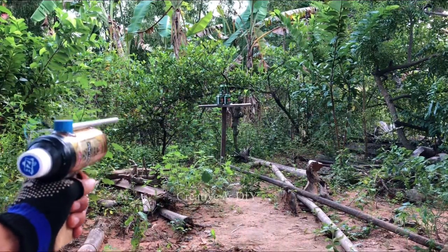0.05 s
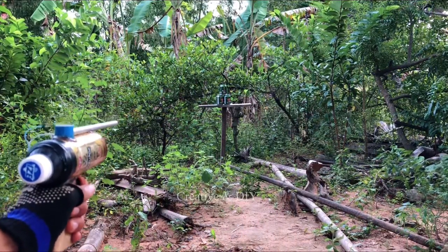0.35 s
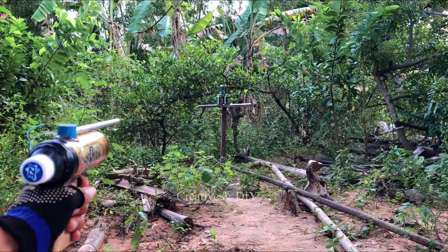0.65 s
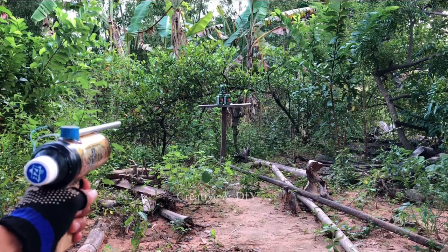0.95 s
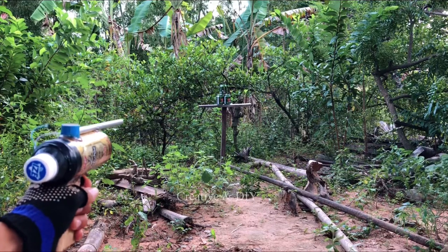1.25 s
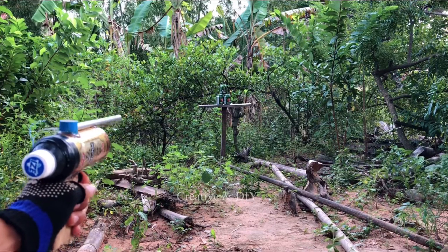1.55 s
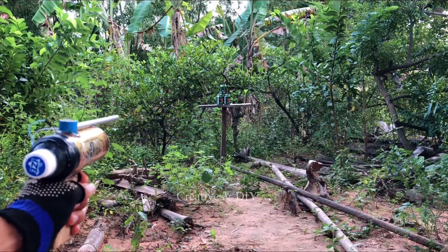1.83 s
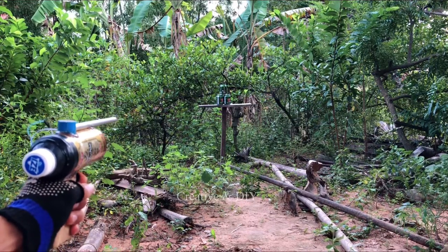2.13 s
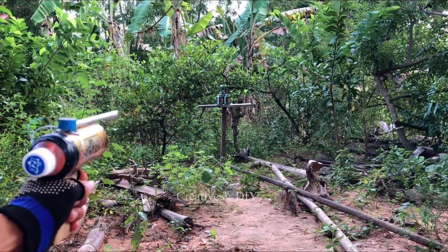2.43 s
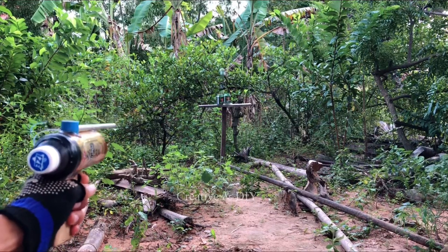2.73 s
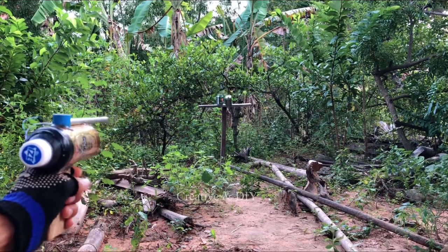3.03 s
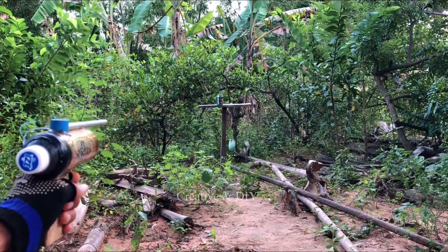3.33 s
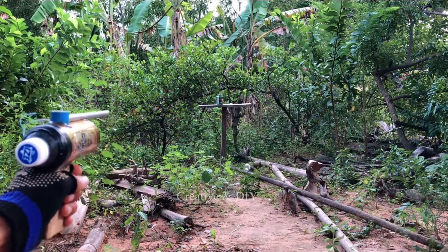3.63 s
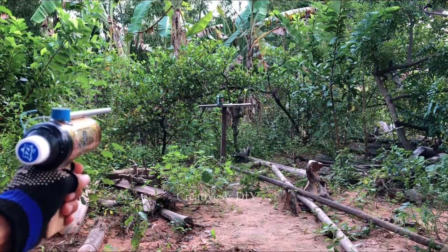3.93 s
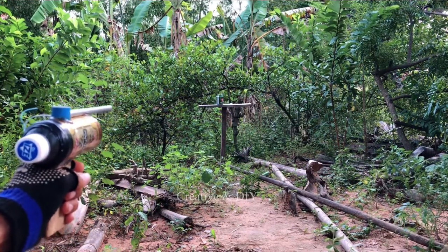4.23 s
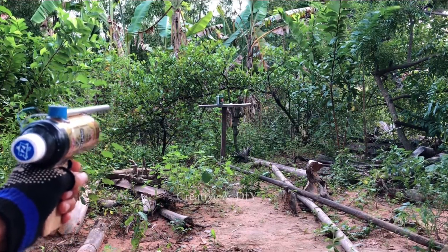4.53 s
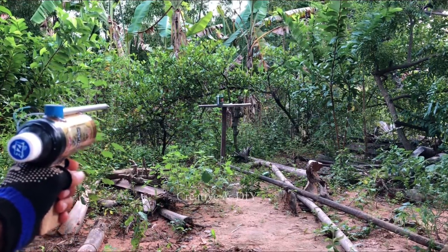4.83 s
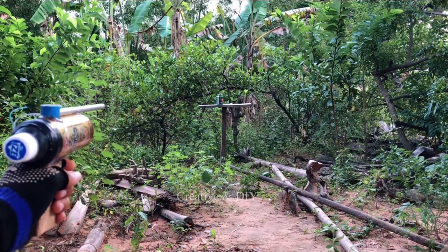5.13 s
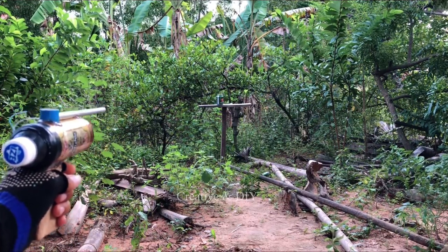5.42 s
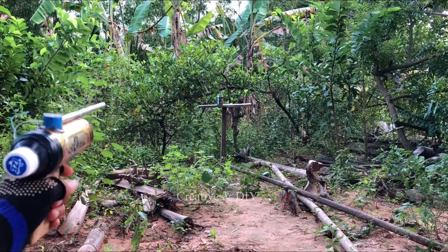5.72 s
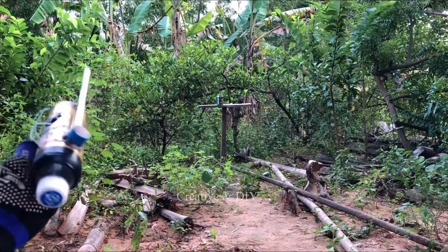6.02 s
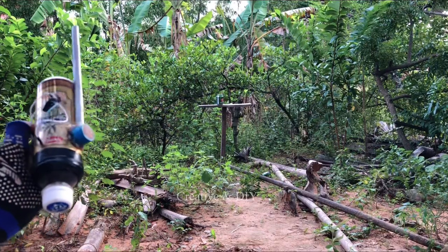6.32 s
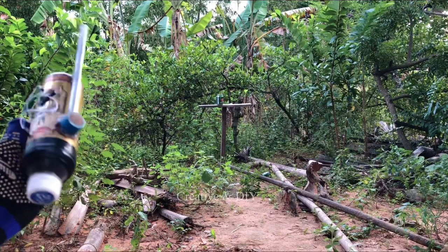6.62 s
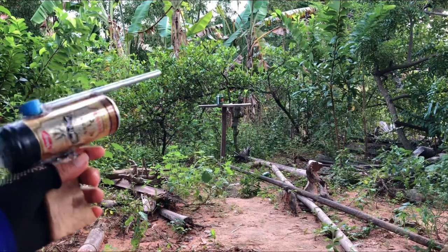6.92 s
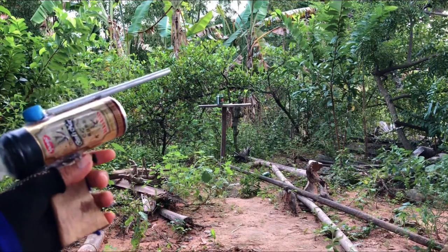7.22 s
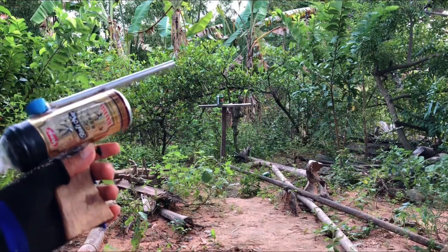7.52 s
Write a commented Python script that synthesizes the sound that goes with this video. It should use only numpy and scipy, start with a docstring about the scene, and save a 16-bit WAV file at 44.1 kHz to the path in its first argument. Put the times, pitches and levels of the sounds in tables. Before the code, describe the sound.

In a quiet garden with faint hissing insects and a low rumble, a homemade can gun clicks and fires with a sharp, hissing pop. A split second later the pellet cracks against a small tin. The tin totters, drops onto wooden poles with a loud clank and bounces a few times. Afterwards a glove rustles softly and a bird calls far off. The microphone is just behind the gun.

```python
"""Can gun in a garden

A spirit gun made of drink cans fires: the igniter clicks, burning gas rushes out with a pop, and the
pellet cracks against a small tin. The tin totters on its stand, falls onto wooden poles and bounces
away; a glove rustles. Insects hiss in the overgrown foliage over a low rumble, and birds call far off."""
import sys
import numpy as np
from scipy import signal
from scipy.fft import rfft, irfft, next_fast_len
from scipy.io import wavfile

SR = 44100
rng = np.random.default_rng(int(sys.argv[2]) if len(sys.argv) > 2 else 0)


def dump_mix(stems):
    """Bounce the given channels to the path in sys.argv[1] as a 16-bit WAV at rate SR."""
    frames = np.atleast_2d(stems).T  # one column per channel
    limited = np.clip(frames, -1, 1)  # hard clip at full scale
    pcm = np.round(limited * 32767).astype(np.int16)
    wavfile.write(sys.argv[1], SR, pcm)


N = 333616
TIME_S = np.arange(N) / SR

# Noise spectra. Each row: frequency in Hz, relative level in dB.
AIR_SPECTRUM = [(20, -44), (35, -17), (55, -3), (135, 4.5), (200, -2.5), (300, -10.5), (600, -15.5),
                (1200, -18), (2000, -20.5), (3500, -21), (5200, -24.5), (7500, -26), (12000, -30.5),
                (16000, -38)]
RUMBLE_SPECTRUM = [(25, -32), (60, 3.5), (90, 2.5), (130, 4.5), (190, -4.5), (400, -18), (2000, -66)]
BREEZE_SPECTRUM = [(100, 4), (300, -14.5), (650, -2), (1150, -4), (2000, -16), (5000, -58)]
CLICK_SPECTRUM = [(300, -23), (1200, -12), (3000, -3.5), (6000, 1), (10000, 0), (16000, -7)]
JET_SPECTRUM = [(60, -10), (250, -11), (800, -17.5), (1600, -10), (2500, -4.5), (3900, -7.5), (5200, -2),
                (8500, 0.5), (10500, 0), (13000, 0.5), (16000, -4)]
POP_SPECTRUM = [(50, -14), (250, -10), (800, 3), (2500, 3), (6000, -26), (16000, -4)]
HIT_SPECTRUM = [(100, -15), (500, -6), (800, 5), (1150, 18), (1500, 7), (1800, -3), (3200, 3), (6000, -3),
                (10000, 3.5), (16000, -19)]
NEAR_ECHO_SPECTRUM = [(80, -20), (400, -9), (750, 4), (1050, 5), (1400, -3.5), (2000, -2), (5500, 2),
                      (10000, -1), (16000, -3.5)]
FAR_ECHO_SPECTRUM = [(80, -16), (450, 5.5), (800, -0.5), (1500, 5), (3500, -4.5), (8000, -12.5),
                     (16000, -19)]
LANDING_SPECTRUM = [(100, -13), (520, 5.5), (750, -2.5), (1000, -15), (1350, -2.5), (1800, -4),
                    (3200, -2.5), (5200, 1.5), (9500, -2), (16000, -13.5)]
GLOVE_SPECTRUM = [(500, -14), (2500, -1), (7000, 5), (12000, -2), (16000, -16)]
# Gusts. Each row: crest and half-width in seconds, rumble rise and breeze rise in dB.
WIND_GUSTS = [(.15, 0.27, 1.5, 3), (2.0, .28, 7, 3), (4.25, 0.43, 7, 9), (5.15, 0.49, 7.5, 8),
              (6.1, 0.42, 6.5, 5.5)]
# Insect chorus. Each row: centre and width in Hz, level and signed throb depth in dB.
INSECT_BANDS = [(6190, 230, -61, .5), (8236, 470, -56.5, 3), (8800, 380, -61.5, -2.5),
                (10000, 830, -57.5, -0.2), (10570, 600, -57, 0.2), (11250, 450, -66, -3)]
# Cricket trills. Each row: start and length in seconds, level in dB.
CRICKET_TRILLS = [(0.01, .35, -63.5), (1.147, .25, -63), (2.105, 0.095, -59), (4.09, 0.37, -62.5),
                  (4.797, 0.094, -59), (5.023, 0.16, -56.5), (5.65, 0.2, -58), (5.876, 0.1, -58.5),
                  (7.284, 0.084, -54)]
# Small bird. Each row: start in seconds, level in dB.
BIRD_CHIRPS = [(1.14, -61), (4.91, -57.5), (5.97, -58)]
# Far birds. Each row: start and length in seconds, level and relative octave level in dB,
# pitch, scoop depth and warble depth in Hz.
BIRD_CALLS = [(1.6, 0.68, -53.5, -6, 1416, 480.5, 10), (6.599, 1.1, -50, -13, 1730, -80, 54.7)]
# Scatter from leaves and trunks. Each row: frequency in Hz, relative level in dB, T60 in seconds.
FOLIAGE_BANDS = [(100, 0, 0.3), (400, 3, 0.24), (1300, -2, 0.43), (3355, 2.5, 0.28), (8000, -5, 0.39),
                 (16000, -0.5, 0.15)]
# Igniter and trigger. Each row: start in seconds, level in dB, T60 in seconds.
IGNITER_CLICKS = [(2.4791, -1, 0.0089), (2.483, -15, .008), (2.751, -14, 0.0081)]
# Gas leaks, forces past the pellet, then rushes from the can.
# Each row: start, attack, hold and release T60 in seconds, level in dB.
JET_STAGES = [(2.483, .002, .012, .02, -29), (2.495, .009, .011, .02, -3), (2.515, .014, 0.027, .11, -7)]
# Tin and pole modes. Each row: frequency in Hz, relative level in dB, T60 in seconds.
TIN_MODES = [(1276, -30, .33), (1400, -29, .18), (1588, -32, .55), (1690, -28, .65), (3397, -26.5, .33),
             (2304, -17.5, .17), (2923, -22, .15), (3149, -29, .2), (3671, -25, .24), (4280, -25, .14),
             (4624, -21, .13), (4800, -17.5, .12), (5093, -18.5, .14), (5604, -20, .12), (6670, -31, .14),
             (7542, -29, .12)]
POLE_MODES = [(455, -10, 0.086), (590, -10.5, 0.027), (1565, -19, 0.11), (2475, -10.5, 0.097),
              (5640, -29, 0.16), (7360, -11.5, 0.035)]
# Tin on its stand. Each row: start in seconds, relative scrape level in dB, scrape T60 in seconds,
# relative ring level in dB, pitch in Hz.
STAND_CONTACTS = [(3.006, -32, 0.18, -30.5, 1470), (3.04, -42, 0.15, -33.5, 1272),
                  (3.085, -48, .08, -34, 1760), (3.097, -46, 0.089, -34, 2116),
                  (3.205, -36, 0.059, -50, 1580)]
# Ring of one contact. Each row: pitch multiple, relative level in dB, T60 in seconds.
CONTACT_MODES = [(1, -1.5, 0.14), (1.5, -8, .09), (2.06, -3, 0.048), (3.12, 0, 0.032)]
# Tin on the poles. Each row: start in seconds, gains of crack, tin, pole and clank in dB,
# clank centre in Hz, clank T60 in seconds.
TIN_BOUNCES = [(3.4645, -41, -45, -42, -8, 1910, 0.032), (3.4665, -4.5, 1, -2, 5, 1898, 0.015),
               (3.507, -27, -13, -30, -23.5, 718, 0.18), (3.587, -42, -27, -24.5, -27, 2560, 0.073),
               (3.69, -38, -36, -48, -36.5, 5300, .07), (3.7575, -29.5, -26, -15.5, -36, 2450, 0.027),
               (3.899, -31.5, -29, -52, -37, 3390, 0.16), (3.993, -51, -34, -41, -39.5, 3650, 0.14)]


def from_db(db):
    """Decibels to gain."""
    return 10 ** (np.asarray(db) / 20)


def shaped_noise(gain_at):
    """Unit-RMS noise, spectrum set by a function of frequency."""
    size = next_fast_len(N)
    hz = np.maximum(np.fft.rfftfreq(size, 1 / SR), 1)
    x = irfft(rfft(rng.standard_normal(size)) * gain_at(hz), size)[:N]
    return x / np.sqrt(np.mean(x ** 2) + 1e-20)


def noise(spectrum):
    """Unit-RMS noise from a spectrum table."""
    points_hz, points_db = np.transpose(spectrum)
    return shaped_noise(lambda hz: from_db(np.interp(np.log(hz), np.log(points_hz), points_db)))


def band_noise(centre_hz, width_hz):
    """Unit-RMS noise in one Gaussian band."""
    return shaped_noise(lambda hz: np.exp(-2 * np.log(2) * ((hz - centre_hz) / width_hz) ** 2))


def decay(start_s, t60_s):
    """Instant onset, exponential fall for one second."""
    out, at = np.zeros(N), int(np.ceil(start_s * SR))
    t = TIME_S[:min(SR, N - at)]
    out[at:at + len(t)] = from_db(-60 * t / t60_s)
    return out


def envelope(start_s, attack_s, hold_s, t60_s):
    """Linear rise, hold, exponential release."""
    t = TIME_S - start_s
    return np.clip(t / attack_s, 0, 1) * from_db(-60 * np.clip((t - attack_s - hold_s) / t60_s, 0, 4))


def ring(start_s, modes):
    """Damped sines, common onset, random signs."""
    out, at = np.zeros(N), int(start_s * SR)
    t = TIME_S[:min(SR, N - at)]
    for hz, db, t60_s in modes:
        sign = rng.choice([-1, 1])
        out[at:at + len(t)] += sign * from_db(db - 60 * t / t60_s) * np.sin(2 * np.pi * hz * t)
    return out


def sine(start_s, hz):
    """Sine of steady or running pitch."""
    return np.sin(2 * np.pi * np.cumsum(hz * (TIME_S >= start_s)) / SR)


def falling_sine(start_s, from_hz, to_hz, halving_s):
    """Pressure wave with stretching cycles: pitch drops fast, then slowly."""
    return sine(start_s, to_hz + (from_hz - to_hz) / (1 + np.maximum(TIME_S - start_s, 0) / halving_s))


def garden_echo(x, delay_s, build_s, late_db):
    """Leaves scatter a dense echo that dies by band; far trees add a dull tail."""
    age_s = np.maximum(TIME_S[:SR] - delay_s, 0)
    hz, db, t60_s = np.transpose(FOLIAGE_BANDS)
    edges_hz = np.geomspace(50, 18000, 10)
    leaves = 0
    for low_hz, high_hz in zip(edges_hz, edges_hz[1:]):
        bandpass = signal.butter(2, [low_hz, high_hz], "band", fs=SR, output="sos")
        band = signal.sosfilt(bandpass, rng.standard_normal(SR))
        log_centre = np.log(low_hz * high_hz) / 2
        band_db = np.interp(log_centre, np.log(hz), db)
        band_t60_s = np.interp(log_centre, np.log(hz), t60_s)
        leaves += band * from_db(band_db - 60 * age_s / band_t60_s)
    leaves *= 1 - np.exp(-age_s / build_s)
    dull = signal.butter(1, [300, 3000], "band", fs=SR, output="sos")
    trees = from_db(late_db) * signal.sosfilt(dull, rng.standard_normal(SR))
    response = leaves + trees * np.exp(-age_s / .093) * (1 - np.exp(-age_s / .05))
    return signal.fftconvolve(x, response / np.sqrt(np.sum(response ** 2)))[:N]


def still_air():
    """Steady, bass-heavy noise floor."""
    return from_db(-43.5) * noise(AIR_SPECTRUM)


def wind():
    """Gusts raise a far rumble and a breeze in the leaves."""
    rumble_db, breeze_db = -48.5, -56
    for crest_s, half_width_s, rumble_rise_db, breeze_rise_db in WIND_GUSTS:
        gust = np.exp(-((TIME_S - crest_s) / half_width_s) ** 2)
        rumble_db += rumble_rise_db * gust
        breeze_db += breeze_rise_db * gust
    return from_db(rumble_db) * noise(RUMBLE_SPECTRUM) + from_db(breeze_db) * noise(BREEZE_SPECTRUM)


def insects(throb_hz=7.2):
    """Throbbing chorus and narrow-band cricket trills."""
    throb = np.sin(2 * np.pi * throb_hz * TIME_S + band_noise(centre_hz=1, width_hz=1))
    chorus = sum(from_db(db + depth_db * throb) * band_noise(hz, width_hz)
                 for hz, width_hz, db, depth_db in INSECT_BANDS)
    trills = sum(from_db(db) * np.sqrt(np.maximum(1 - (2 * (TIME_S - start_s) / length_s - 1) ** 2, 0))
                 for start_s, length_s, db in CRICKET_TRILLS)
    return chorus + trills * band_noise(centre_hz=4867, width_hz=37)


def birds():
    """Falling chirps and scooped, warbling calls; paths through the trees blur level and phase."""
    chirp_s, chirp_hz, sag_hz_per_s, chirp_rasp_hz = .35, 3610, 800, 70
    scoop_s, warble_rate_hz, attack_s, release_s, call_rasp_hz = .11, 2.65, .14, .21, 22
    song = np.zeros(N, complex)
    rasp = band_noise(centre_hz=30, width_hz=79)
    for start_s, db in BIRD_CHIRPS:
        on = (TIME_S >= start_s) & (TIME_S < start_s + chirp_s)
        t = TIME_S[on] - start_s
        pitch_hz = chirp_hz - sag_hz_per_s * t + chirp_rasp_hz * rasp[on]
        tone = np.exp(2j * np.pi * np.cumsum(pitch_hz) / SR)
        song[on] += from_db(db) * np.sin(np.pi * np.sqrt(t / chirp_s)) * tone
    for start_s, length_s, db, octave_db, hz, scoop_hz, warble_hz in BIRD_CALLS:
        on = (TIME_S >= start_s) & (TIME_S < start_s + length_s)
        t = TIME_S[on] - start_s
        pitch_hz = hz - scoop_hz * np.exp(-t / scoop_s) - warble_hz * np.cos(2 * np.pi * warble_rate_hz * t)
        tone = np.exp(2j * np.pi * np.cumsum(pitch_hz + call_rasp_hz * rasp[on]) / SR)
        effort = np.clip(np.minimum(t / attack_s, (length_s - t) / release_s), 0, 1)
        song[on] += from_db(db) * effort * (tone + from_db(octave_db) * tone ** 2)
    blur = band_noise(centre_hz=0, width_hz=85) + 1j * band_noise(centre_hz=0, width_hz=85)
    return np.real(blur * song)


def igniter():
    """Sharp clicks; the first rings the housing."""
    clicks = sum(from_db(db) * decay(start_s, t60_s) for start_s, db, t60_s in IGNITER_CLICKS)
    dry = clicks * noise(CLICK_SPECTRUM) + ring(IGNITER_CLICKS[0][0], [(3130, -12.5, .019)])
    return dry + from_db(-7.5) * garden_echo(dry, delay_s=.0071, build_s=.003, late_db=-28)


def shot(pop_s=2.5105, whistle_s=2.56, sag_hz_per_s=570):
    """Gas hisses past the pellet, pops and expands into a thump and boom; the barrel whistles."""
    flow = sum(from_db(db) * envelope(*timing_s) for *timing_s, db in JET_STAGES)
    jet = flow * noise(JET_SPECTRUM)
    pop = from_db(-6.5) * decay(pop_s, t60_s=.019) * noise(POP_SPECTRUM)
    pulse = falling_sine(pop_s, from_hz=2200, to_hz=60, halving_s=.000603)
    thump = from_db(-5) * decay(pop_s, t60_s=.026) * pulse
    boom = from_db(-25.5) * envelope(pop_s, attack_s=.015, hold_s=.0083, t60_s=.16) * sine(pop_s, hz=82.5)
    jitter_hz = 45 * band_noise(centre_hz=60, width_hz=150)
    tone = sine(whistle_s, 3385 - sag_hz_per_s * (TIME_S - whistle_s) + jitter_hz)   # sags as flow dies
    whistle = from_db(-19.5) * envelope(whistle_s, attack_s=.015, hold_s=.033, t60_s=.04) * tone
    dry = jet + pop + thump + boom + whistle
    return dry + from_db(-9.5) * garden_echo(dry, delay_s=.019, build_s=.018, late_db=-11)


def pellet_hit(hit_s=2.6198, echo_s=2.632):
    """Crack, knock and faint tin ring; near bushes throw it back, far trees add a dull tail."""
    impact = decay(hit_s, t60_s=.012) + from_db(-11) * decay(hit_s, t60_s=.03)
    crack = from_db(1.5) * impact * noise(HIT_SPECTRUM)
    pulse = falling_sine(hit_s, from_hz=1370, to_hz=450, halving_s=.004)
    knock = from_db(-5.5) * decay(hit_s, t60_s=.021) * pulse
    tin = from_db(.5) * ring(hit_s, TIN_MODES[:4])   # only the lowest modes carry this far
    build = 1 - np.exp(-np.maximum(TIME_S - echo_s, 0) / .0019)
    near = from_db(-6) * decay(echo_s, t60_s=.22) * noise(NEAR_ECHO_SPECTRUM)
    far = from_db(-26.5) * decay(echo_s, t60_s=.92) * noise(FAR_ECHO_SPECTRUM)
    return crack + knock + tin + build * (near + far)


def tin_totters():
    """Each touch on the stand scrapes grittily and rings at its own pitch."""
    grit = from_db(2.5 * band_noise(centre_hz=100, width_hz=190))
    scrape = grit * noise(CLICK_SPECTRUM)
    dry = 0
    for start_s, scrape_db, scrape_t60_s, ring_db, hz in STAND_CONTACTS:
        dry += from_db(scrape_db) * decay(start_s, scrape_t60_s) * scrape
        dry += ring(start_s, [(hz * ratio, ring_db + db, t60_s) for ratio, db, t60_s in CONTACT_MODES])
    return from_db(-.5) * dry + from_db(-4) * garden_echo(dry, delay_s=.0029, build_s=.003, late_db=-26)


def tin_lands():
    """Each landing cracks, clanks at a pitch set by the spot struck, and rings tin and poles."""
    crack = noise(LANDING_SPECTRUM)
    dry = 0
    for start_s, crack_db, tin_db, pole_db, clank_db, clank_hz, clank_t60_s in TIN_BOUNCES:
        impact = decay(start_s, t60_s=.015) + from_db(-8.5) * decay(start_s, t60_s=.21)
        spread = min(.3, (clank_hz / 2800) ** 3)   # wall modes; a low clank is nearly one note
        cluster_hz = clank_hz * (1 + spread * np.linspace(-1, 1, 7) + rng.normal(0, .01, 7))
        clank = ring(start_s, [(hz, clank_db - 9, clank_t60_s) for hz in cluster_hz])
        tin = ring(start_s, [(hz, tin_db + db + rng.normal(0, 1.5), t60_s) for hz, db, t60_s in TIN_MODES])
        poles = from_db(pole_db) * ring(start_s, POLE_MODES)
        dry += from_db(crack_db) * impact * crack + clank + tin + poles
    return dry + from_db(-17) * garden_echo(dry, delay_s=.02, build_s=.006, late_db=-17)


def glove():
    """The glove rustles as it turns the gun."""
    turn = envelope(start_s=6.34, attack_s=.05, hold_s=.33, t60_s=2.6)
    return from_db(-54.5) * turn * noise(GLOVE_SPECTRUM)


def scene():
    """Mono sum at a microphone behind the gun."""
    events = igniter() + shot() + pellet_hit() + tin_totters() + tin_lands()
    return (events + insects() + birds() + wind() + glove() + still_air())[None]


def record(dry, low_cut_hz=33, high_cut_hz=16050, ceiling=1.17):
    """Small microphone: deep bass dropped, peaks overloaded, top cut."""
    highpass = signal.butter(3, low_cut_hz, "high", fs=SR, output="sos")
    lowpass = signal.ellip(10, .1, 70, high_cut_hz, fs=SR, output="sos")
    clipped = ceiling * np.tanh(signal.sosfilt(highpass, dry) / ceiling)
    return signal.sosfilt(lowpass, clipped)


dry = scene()
out = record(dry)
dump_mix(out)
```